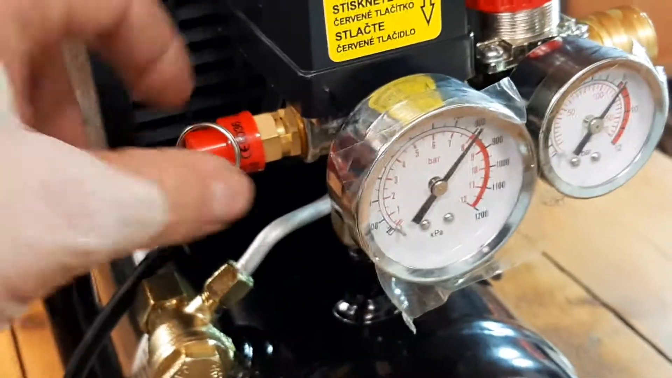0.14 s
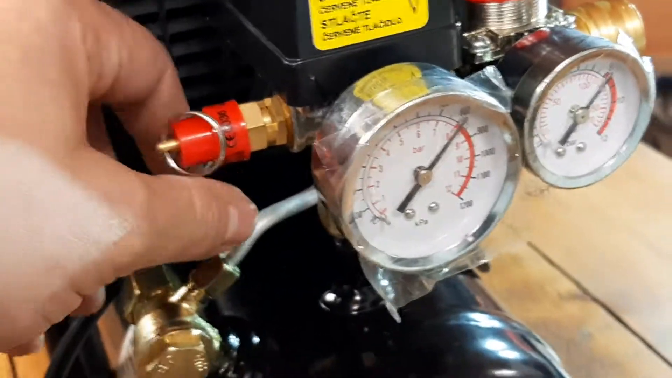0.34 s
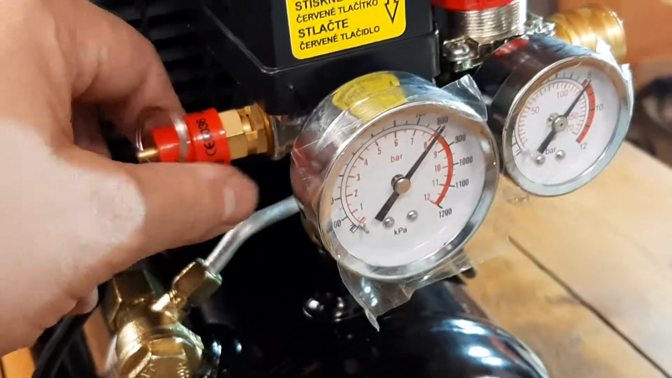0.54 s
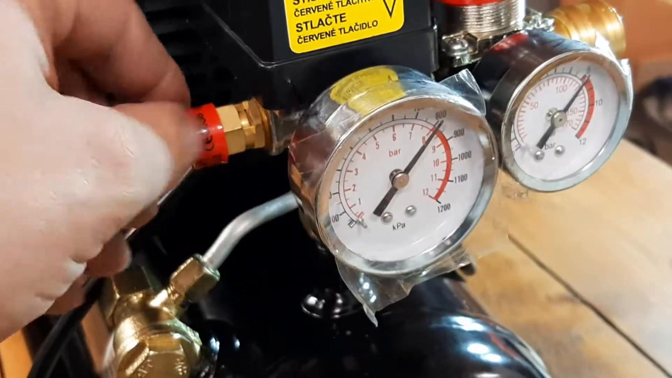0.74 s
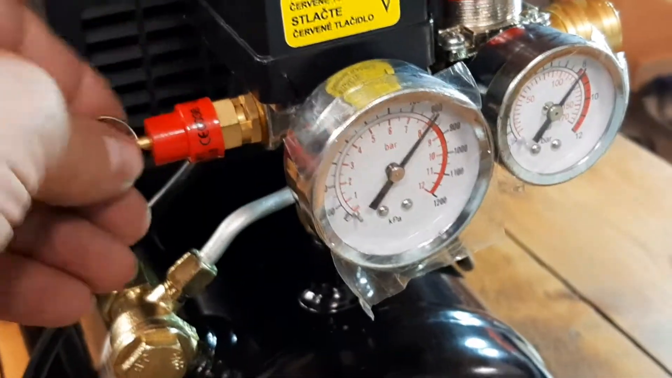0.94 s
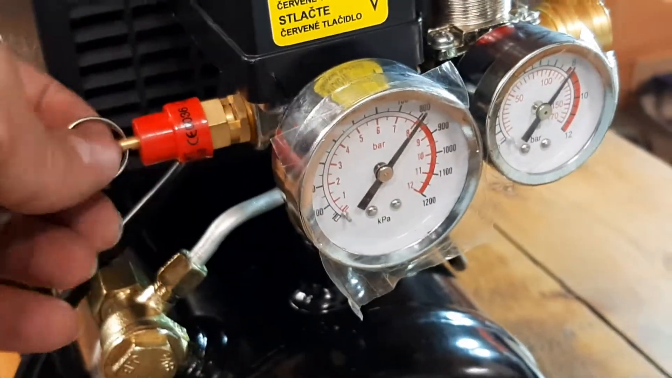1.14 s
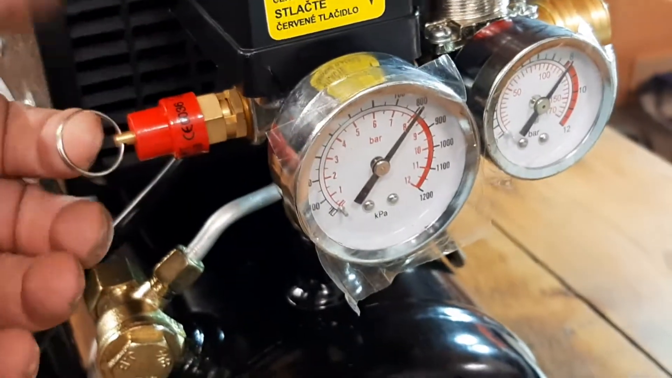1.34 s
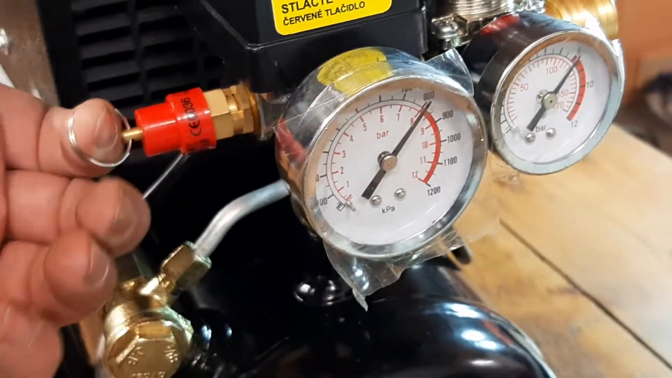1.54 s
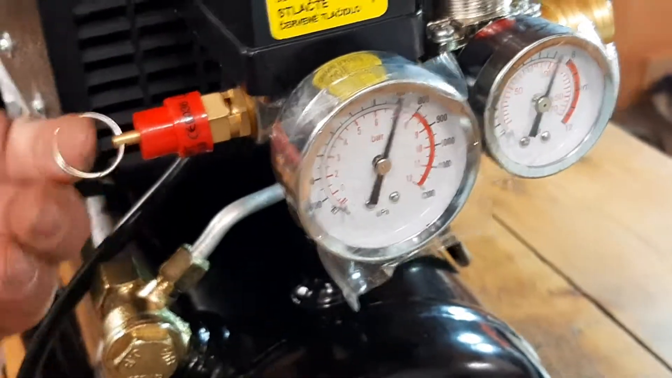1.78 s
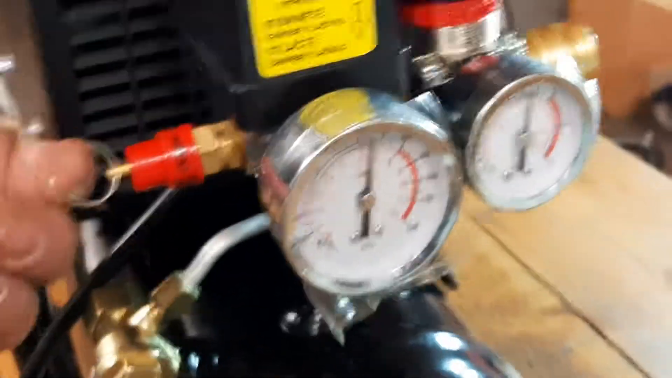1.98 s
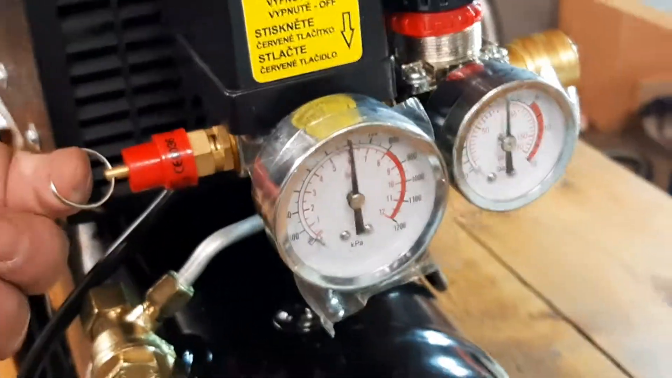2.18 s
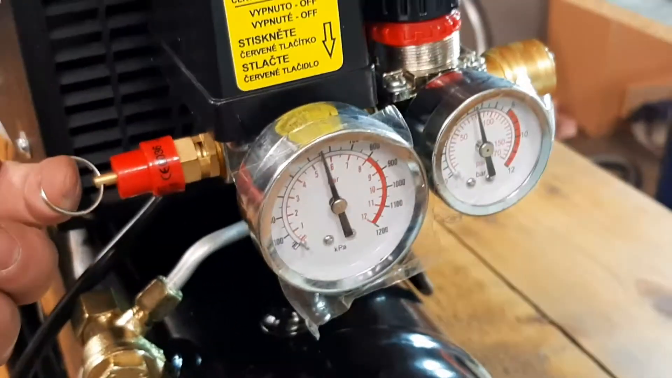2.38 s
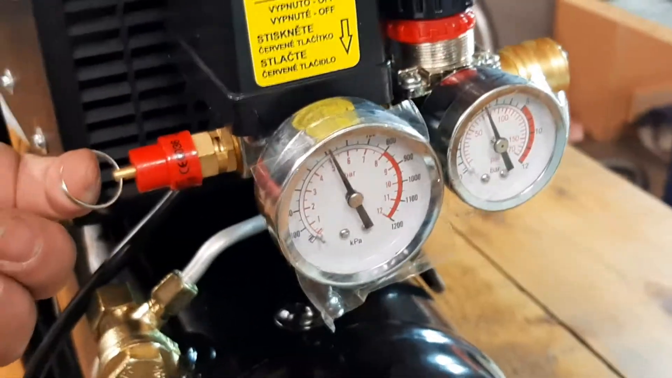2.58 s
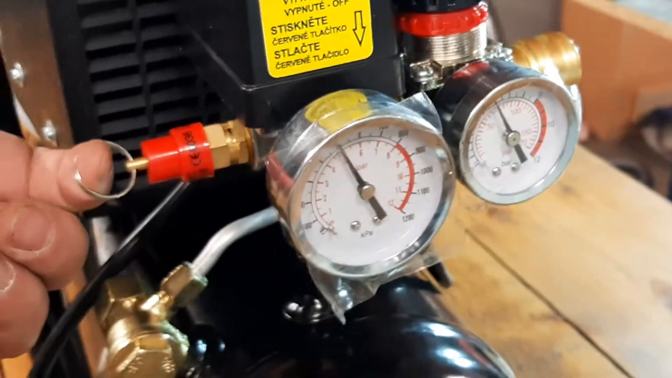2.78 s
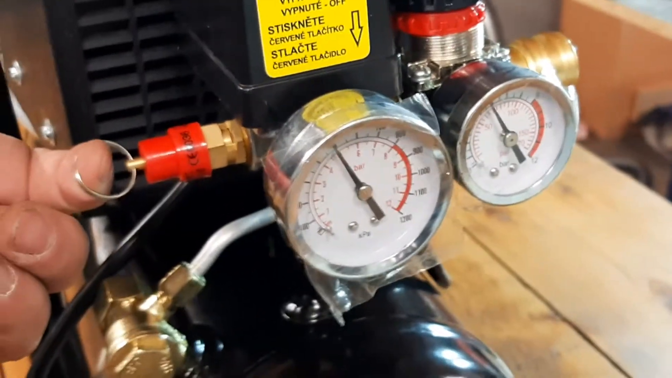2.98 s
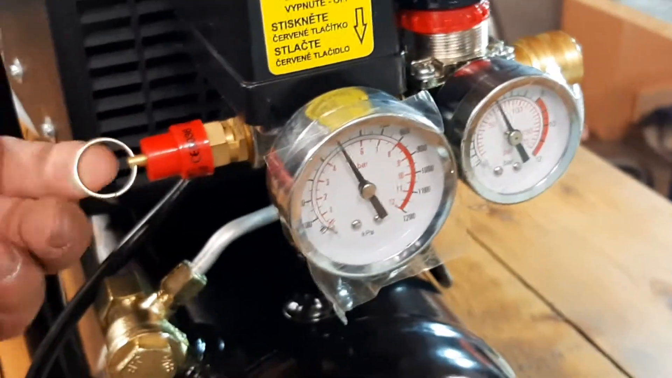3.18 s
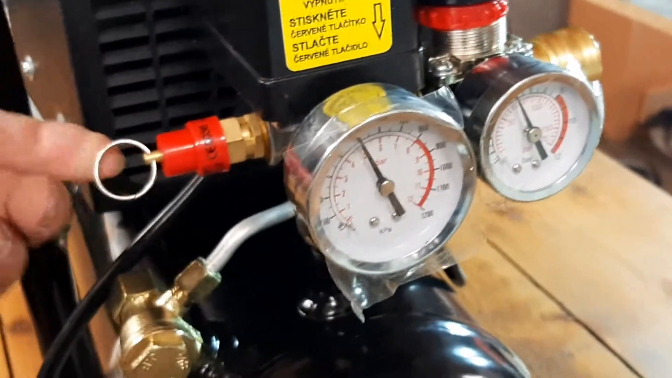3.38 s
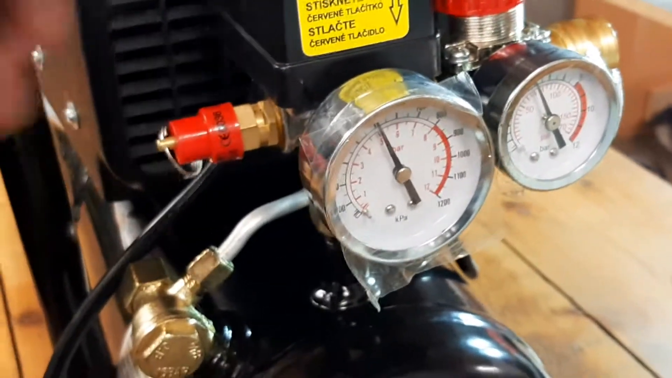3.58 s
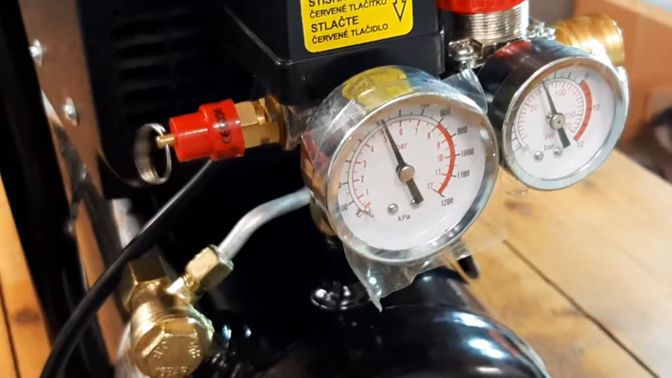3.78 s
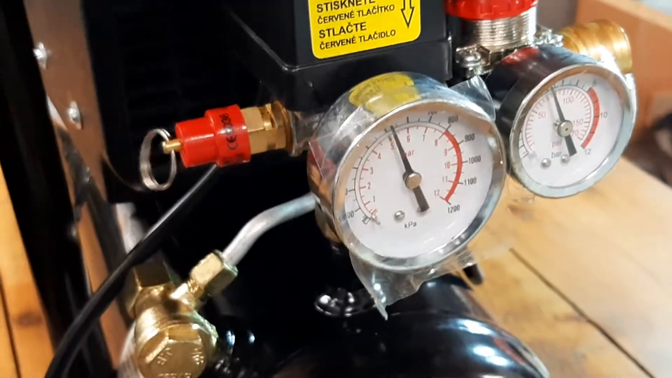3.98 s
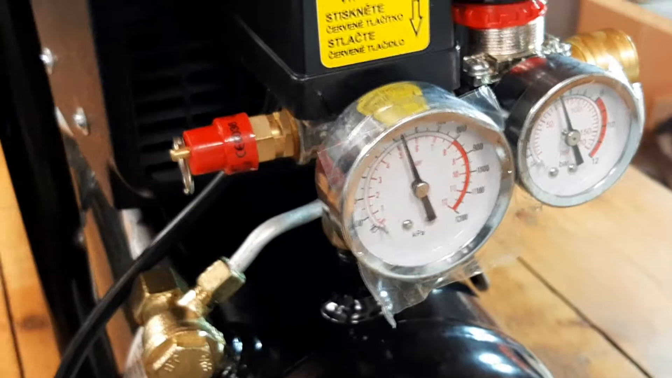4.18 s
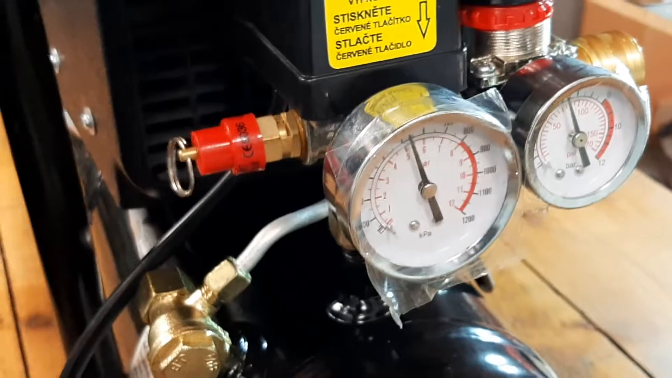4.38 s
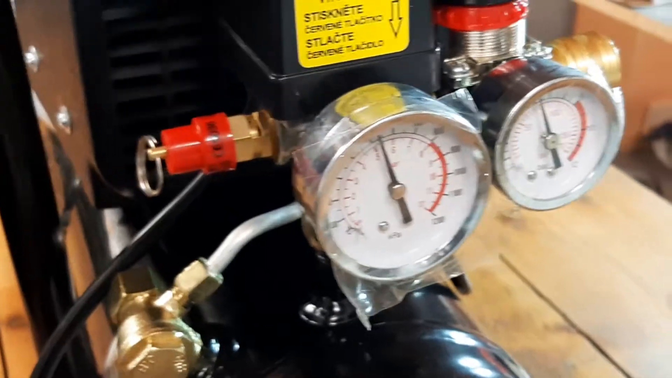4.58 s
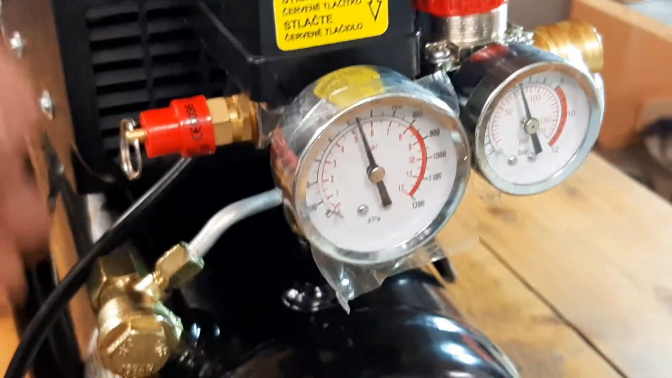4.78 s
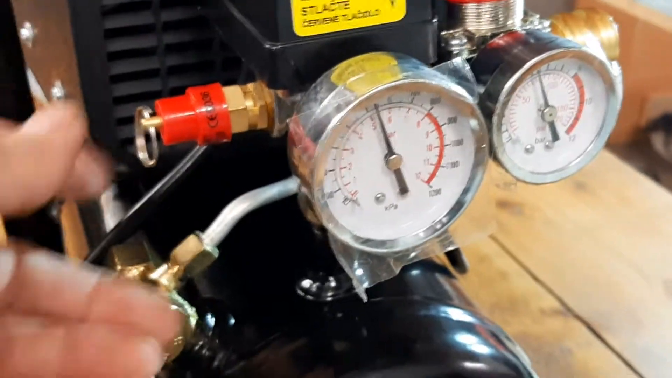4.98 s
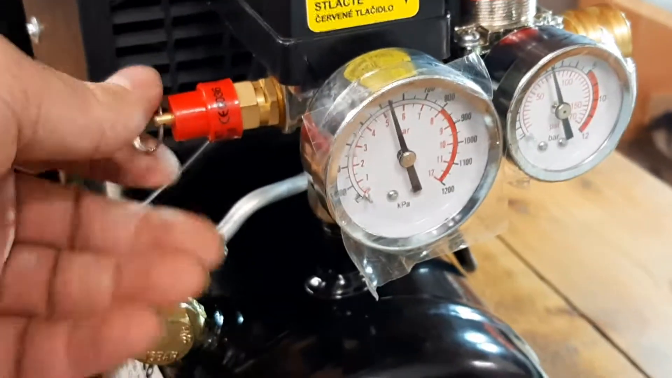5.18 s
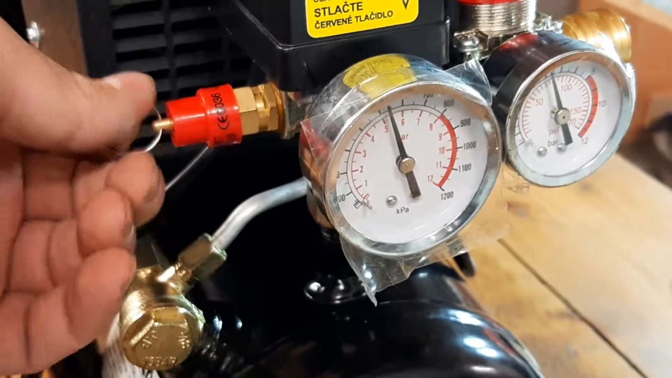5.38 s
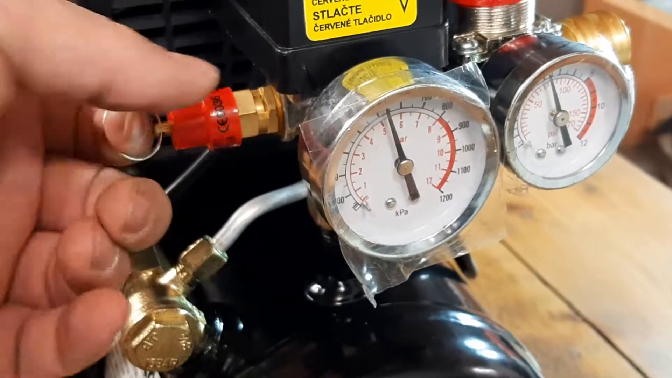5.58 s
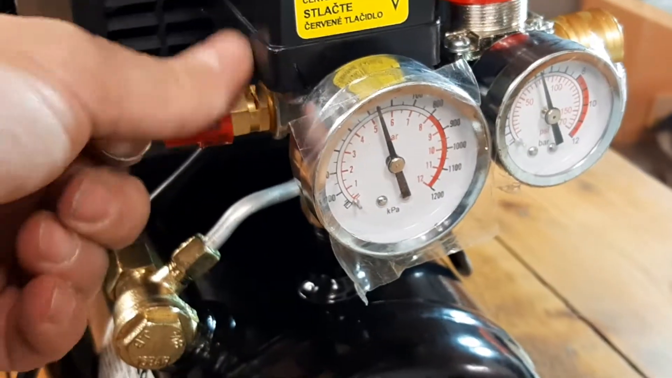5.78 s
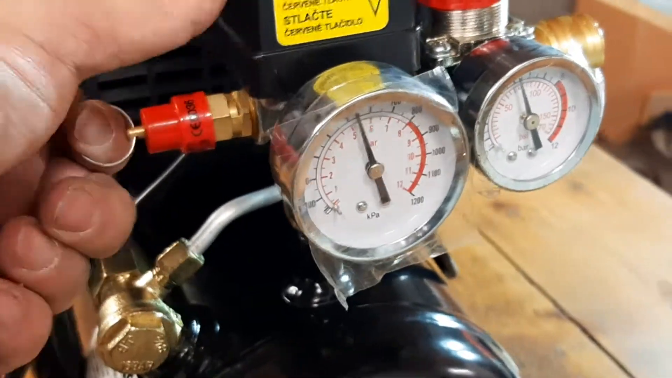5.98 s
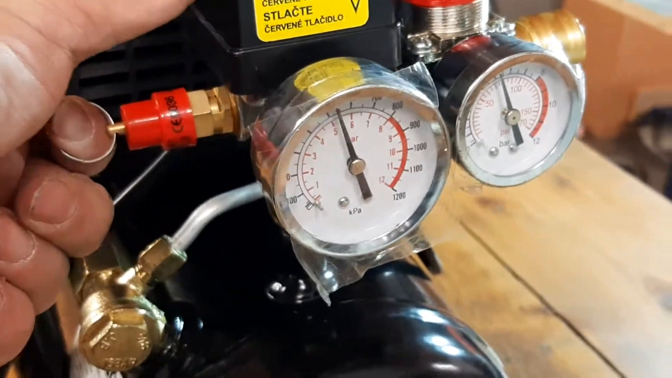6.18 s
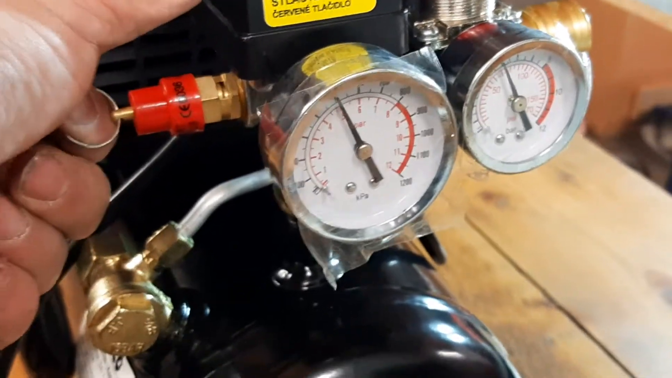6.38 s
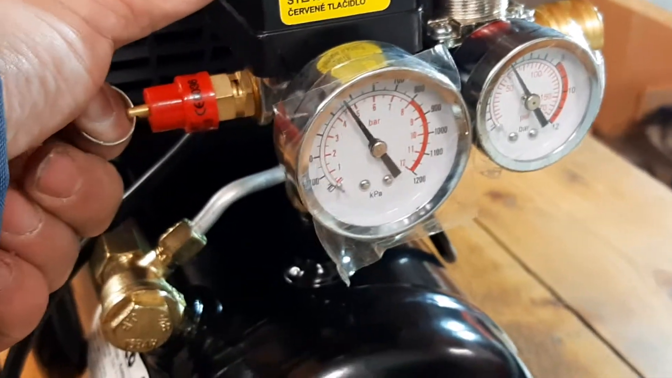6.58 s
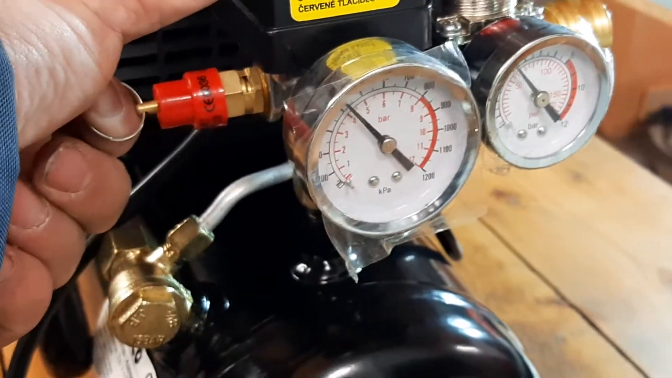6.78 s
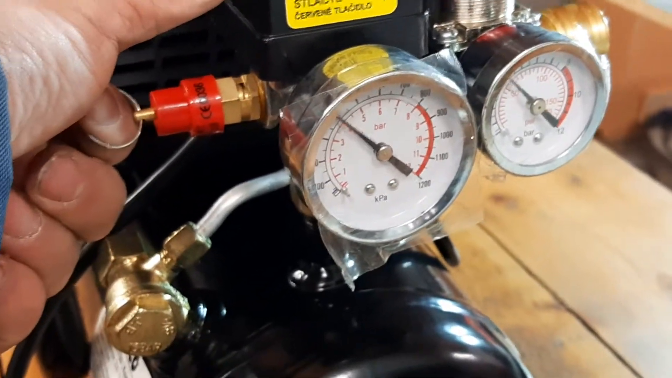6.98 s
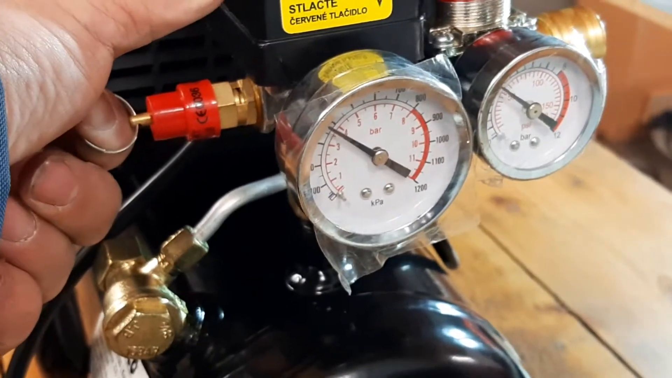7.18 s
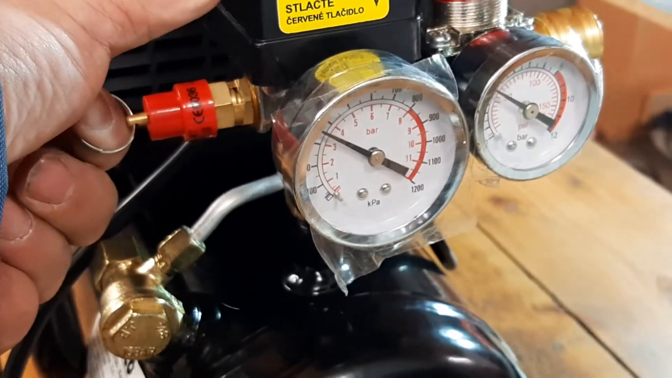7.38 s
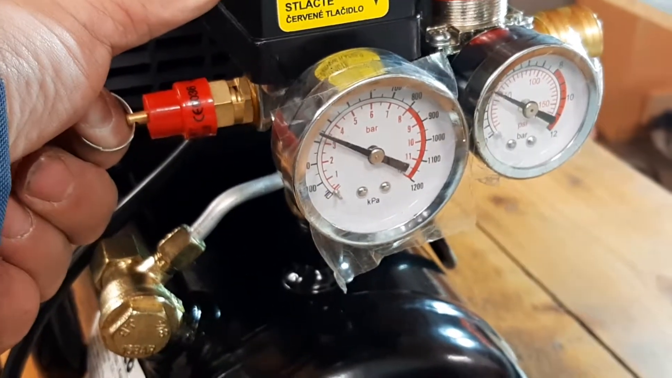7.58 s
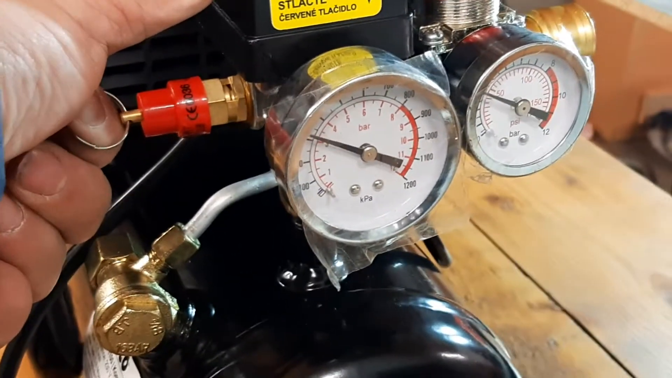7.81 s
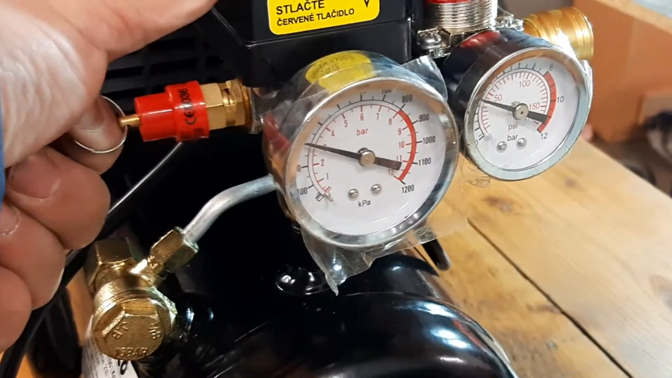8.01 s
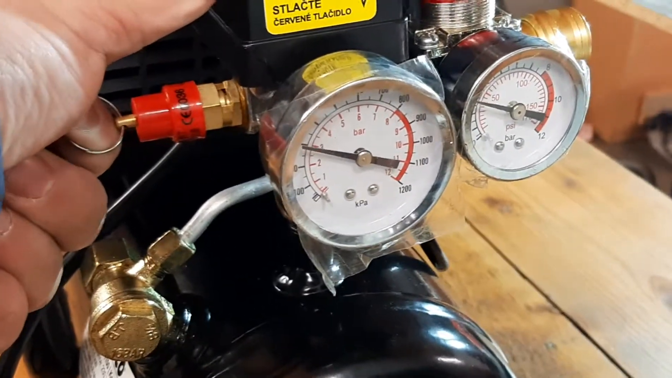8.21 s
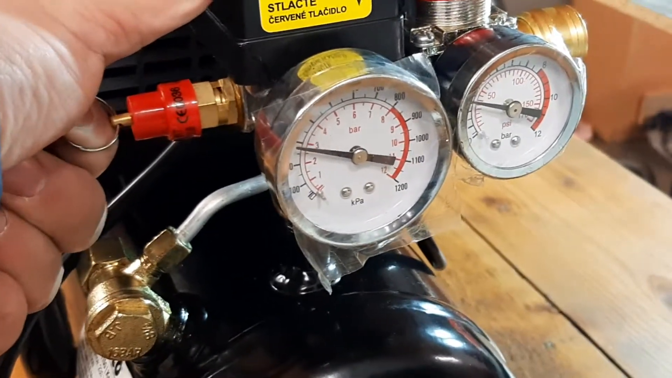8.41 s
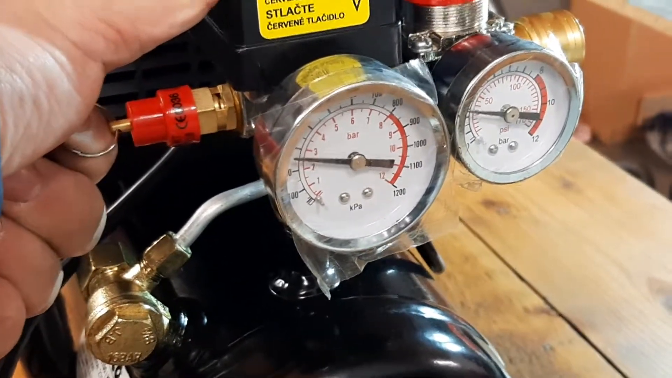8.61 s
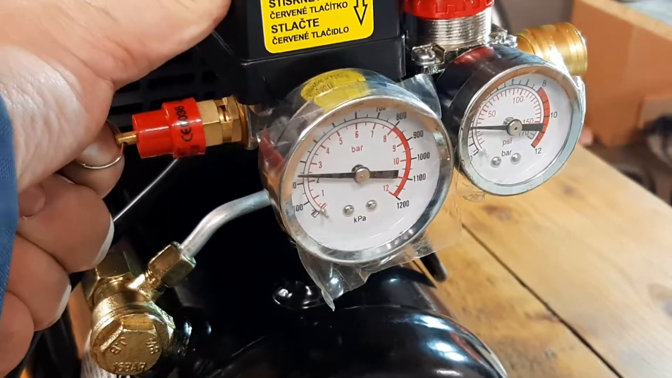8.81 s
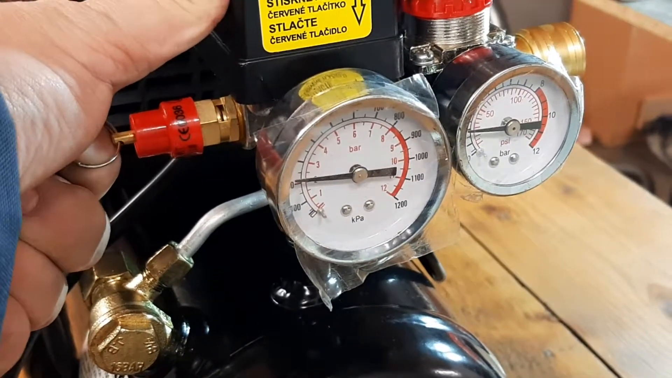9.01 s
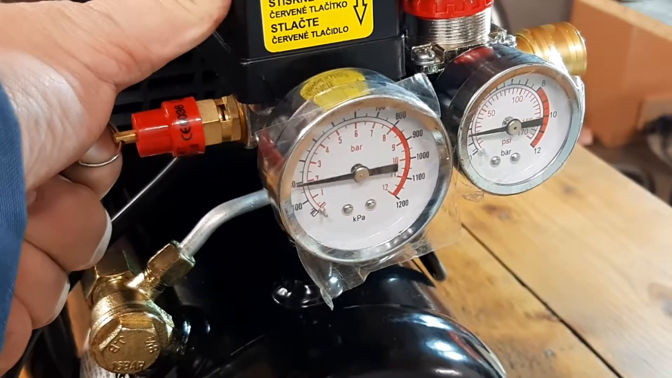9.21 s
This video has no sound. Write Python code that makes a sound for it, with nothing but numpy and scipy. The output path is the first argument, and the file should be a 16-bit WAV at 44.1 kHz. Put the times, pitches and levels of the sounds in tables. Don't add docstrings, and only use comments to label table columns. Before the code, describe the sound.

Very close stereo microphones, struck by the air stream and clipping. Light finger clicks and sleeve rustle first, then an abrupt full-band roaring hiss. It ends sharply into a droning, clattering air pump, which is cut by a dry snap, a spitting hiss and brief tank ringing. Near silence, a few firm metal clacks, then another overwhelming air blast, unsteady and duller in its weakening later part, in a short-reverb workshop.

```python
import sys
import numpy as np
from scipy import signal
from scipy.fft import rfft, irfft, next_fast_len
from scipy.io import wavfile
from scipy.ndimage import uniform_filter1d, map_coordinates

SR = 44100
rng = np.random.default_rng(int(sys.argv[2]) if len(sys.argv) > 2 else 0)


def magnitude_from_level(level_db):
    exponent = np.asarray(level_db, float) / 20
    return 10 ** exponent


def transcribe(u):
    v = np.clip(np.atleast_2d(u).T, -1, 1)
    q = np.round(v * 32767).astype(np.int16)
    wavfile.write(sys.argv[1], SR, q)


N = 407925

# (time [s], flow [dB], how squarely the wake hits the ports [dB])
VALVE_PULLS = [
    [(1.7, -24, -12), (1.71, -22, -8.5), (2.28, -20, -9.5), (2.7, -18, -9.5), (2.99, -17, -10)],
    [(6.336, -20, -10.5), (6.8, -19, -10), (7.45, -19, -8.5), (7.9, -22.5, -5), (8.47, -26.5, -7),
     (8.495, -23, -8), (8.77, -24, -7), (8.95, -20.5, -10), (9.25, -20.5, -16)],
]
# (frequency [Hz], density [dB per Hz])
JET_SPECTRUM = [(15, -54), (25, -26), (48, -20), (110, -4.5), (315, 0), (361, 1), (1210, 0), (1590, -0.5),
                (4300, 0), (6280, -4.5), (8220, -15.5), (9160, -10.5), (12000, 0.5), (14500, 0),
                (15700, -4)]
# (frequency [Hz], density [dB per Hz])
RUSTLE_SPECTRUM = [(350, -35.5), (600, -10), (1110, -12), (1360, -5.5), (1860, -7.5), (3350, -7),
                   (4470, -5.5), (6290, -4), (8970, -16.5), (12600, -9.5), (15700, -24)]
# (frequency [Hz], density [dB per Hz])
SKIN_SPECTRUM = [(500, -41.5), (1100, -13), (1500, -4), (3300, 4), (6500, -3.5), (9000, -22.5),
                 (15700, -18.5)]

PUMP_OFF_S = 4.225
MUTE_S, RETURN_S = 5.0, 5.44


def jet():
    # (left-right at start [dB], left-right at end [dB])
    drift = [
        (0, 2.5),
        (0, 1),
    ]
    usual_flow_db, usual_wake_db = -20, -9
    edge_base_db, edge_follows = -2, 0.23
    fizz_base_db, fizz_follows, fizz_loss_db_per_s = 2.8, 0.6, 1.6
    bass_hz, bass_grows = 170, 1.2

    hiss = rush(JET_SPECTRUM, patchy_db=1.12, lo_hz=550, hi_hz=3750)
    buffet = magnitude_from_level(1.3 * np.array([wobble(25), wobble(25)]))
    roar = rush(JET_SPECTRUM, patchy_db=1.25, hi_hz=530) * buffet
    edge = rush(JET_SPECTRUM, patchy_db=1.8, lo_hz=3900, hi_hz=8300)
    fizz = rush(JET_SPECTRUM, patchy_db=1.8, lo_hz=8440)
    bass = filtered(roar, lambda hz: 1 / (1 + (hz / bass_hz) ** 2))

    out = np.zeros((2, N))
    open_s = np.cumsum(sum(curves(pull)[0] for pull in VALVE_PULLS)) / SR
    for pull, lean_db in zip(VALVE_PULLS, drift):
        gate, flow_db, wake_db = curves(pull)
        more_db = flow_db - usual_flow_db
        wake = roar + (magnitude_from_level(bass_grows * (wake_db - usual_wake_db)) - 1) * bass
        edge_db = edge_base_db + edge_follows * more_db
        fizz_db = fizz_base_db + fizz_follows * more_db - fizz_loss_db_per_s * open_s
        pan = panned(np.interp(clock(), [pull[0][0], pull[-1][0]], lean_db))
        flow = gate * magnitude_from_level(usual_flow_db + 3.5 + 0.7 * wobble(30)) * pan
        body = magnitude_from_level(more_db) * (hiss + magnitude_from_level(wake_db) * wake)
        out += flow * (body + magnitude_from_level(edge_db) * edge + magnitude_from_level(fizz_db) * fizz)

    u = np.arange(SR // 20) / SR / 0.0015
    start = round(VALVE_PULLS[0][-1][0] * SR)
    out[:, start:start + len(u)] += magnitude_from_level([[-1.5], [-9]]) * u * (1 - u / 2) * np.exp(-u)
    return out


def leak():
    # (time [s], level [dB])
    cracks = [
        [(1.688, -58), (1.694, -30), (1.6995, -30)],
        [(6.319, -61), (6.327, -37), (6.335, -30)],
    ]
    thin = rush(JET_SPECTRUM, patchy_db=3.5, lo_hz=3500)
    return sum(gate * magnitude_from_level(db) * thin for gate, db in map(curves, cracks))


def pump():
    # (multiple of shaft rate, level [dB])
    shaft_orders = [(1, -23), (2, -20.5), (3, -16), (4, -12), (5, -6.5), (6, -11.5), (7, -25), (8, -12),
                    (9, -8), (10, -11.5), (11, -3.5), (12, 0), (13, -7.5), (14, -14.5), (15, -9.5),
                    (16, -3), (17, -1.5), (18, -9.5), (19, -3.5), (20, -10), (21, -11), (22, -22),
                    (23, -19.5), (24, -18), (25, -17), (27, -17), (28, -10), (29, -12.5), (31, -14),
                    (50, -16.5)]
    # (frequency [Hz], density [dB per Hz])
    air_spectrum = [(24, -67), (40, -29.5), (98, -29.5), (235, -22), (326, -23.5), (564, -5.5), (655, -13),
                    (761, -11.5), (1080, -22.5), (1350, -15.5), (2650, -19.5), (6190, -18), (8150, -32),
                    (10500, -27.5), (15600, -37.5)]
    # (frequency [Hz], left-right [dB])
    side_balance = [(60, -3.5), (110, 3), (200, 6.5), (380, -10.5), (700, -3), (1290, 4.5), (2380, -3.5),
                    (4400, -10), (8120, -2.5), (15000, 7.5)]
    # (frequency [Hz], density [dB per Hz])
    clack_spectrum = [(820, -34), (1400, -9), (1500, -5), (1590, 1.5), (1990, -9.5), (2380, 0.5),
                      (2540, -9.5), (4090, -14), (4940, -19.5), (6000, -17.5), (7800, -42.5), (13200, -120)]
    on_s, shaft_hz = 2.99, 47.35
    start_air_db, start_fade_s, spin_up_db = 16, 0.08, -4
    final_rise_db, final_rise_s, air_rise_factor = 4, 0.12, 1.3

    gate = between(on_s, PUMP_OFF_S)
    turns = shaft_hz * clock()
    starting = np.exp(-np.abs(clock() - on_s) / start_fade_s)
    rise_db = final_rise_db * np.clip(1 - (PUMP_OFF_S - clock()) / final_rise_s, 0, 1)
    tone_db = -28 + spin_up_db * starting + rise_db
    air_db = -40 + start_air_db * starting + air_rise_factor * rise_db

    tone = np.zeros((2, N))
    for (k, db), (u, v, w) in zip(shaft_orders, rng.standard_normal((len(shaft_orders), 3))):
        apart = np.array([[1], [-1]]) * np.clip(v * 0.026 * k, -1, 1)
        smear = u * np.clip(0.3 * (k - 6), 0.6, 1.5)
        gain = magnitude_from_level(db + 0.46 * wobble(14)) * panned(0.82 * w)[:, None]
        tone += gain * np.cos(2 * np.pi * k * turns + smear + apart)

    strokes = np.diff(np.floor(turns), prepend=0) * magnitude_from_level(0.8 * wobble(32))
    t = np.arange(SR // 5) / SR
    housing = rng.standard_normal((2, len(t))) * magnitude_from_level(-60 * t / 0.14)
    struck = signal.fftconvolve(strokes[None], housing, axes=1)[:, :N]
    clack = filtered(struck, lambda hz: magnitude_from_level(along(clack_spectrum, hz)))
    breathing = 1 + 0.25 * np.cos(2 * np.pi * turns + 0.27)
    air = rush(air_spectrum, patchy_db=-0.2, alike=0.1) * breathing
    noise = magnitude_from_level(tone_db - 10.0) * unit(clack) + magnitude_from_level(air_db + 4) * air
    sided = filtered(noise, lambda hz: panned(along(side_balance, hz)))
    return gate * (magnitude_from_level(tone_db + 0.46) * unit(tone) + sided)


def unloader():
    # (frequency [Hz], density [dB per Hz])
    spit_spectrum = [(650, -45), (1100, -17), (1390, -14), (1920, -14.5), (2740, -15), (3060, -10.5),
                     (3350, -18.5), (3580, -8.5), (4990, 3.5), (5710, -8.5), (6240, -4.5), (9100, -12),
                     (11800, -9), (12600, -7.5), (15700, -11.5)]
    # (frequency [Hz], density [dB per Hz])
    rumble_spectrum = [(18, -58.5), (30, -29), (108, -17), (135, -6), (244, -13.5), (302, -10), (571, -4.5),
                       (673, -6), (832, -8), (1500, -25), (1950, -50.5), (3300, -120)]
    # (frequency [Hz], width [Hz], level [dB])
    tank_modes = [(229, 25, -4.5), (423, 30, -2.5), (519, 14, 0.5), (573, 11, 1.5), (870, 17, -5.5)]
    spit_db, spit_s, shut_db = -25, 0.13, -3
    mute_db_per_s = 150

    after_s = np.maximum(clock() - PUMP_OFF_S - spit_s, 0)

    def fade(t60_s, glow_db, glow_t60_s):
        quick = magnitude_from_level(spit_db + shut_db * (after_s > 0) - 60 * after_s / t60_s)
        return quick + magnitude_from_level(glow_db - 60 * after_s / glow_t60_s)

    off = between(PUMP_OFF_S, RETURN_S)
    gate = off * magnitude_from_level(-mute_db_per_s * np.maximum(clock() - MUTE_S, 0))
    spit = fade(0.4, -48.5, 1.33) * rush(spit_spectrum, patchy_db=2.1, hi_hz=7800)
    fizz = fade(0.29, -73, 1.1) * rush(spit_spectrum, patchy_db=-3.0, lo_hz=8000)
    rumble = rush(rumble_spectrum, patchy_db=1.0, alike=0.73)
    shaking = rush(rumble_spectrum, patchy_db=0.5, alike=0.8)
    ringing = unit(filtered(shaking, resonances(tank_modes)))
    coast_db = -24.5 - 60 * np.abs(clock() - PUMP_OFF_S) / 0.57
    coast = magnitude_from_level(coast_db) * (magnitude_from_level(-2) * rumble + magnitude_from_level(-0.5) * ringing)
    shell = off * magnitude_from_level(-52.5 - 60 * after_s / 1.2) * ringing
    return gate * (magnitude_from_level(2.5) * spit + magnitude_from_level(6.5) * fizz + coast) + shell


def switch():
    snap_s, snap_db, t60_s = 4.216, -21, 0.03
    t = clock() - snap_s
    decay = (t > 0) * magnitude_from_level(snap_db - 60 * np.abs(t) / t60_s)
    return decay * rush(SKIN_SPECTRUM, patchy_db=3.0, alike=0.4)


def fingers():
    # (time [s], peak [dB], pitch [Hz], body knock [dB], left-right [dB])
    touches = [(0.4484, -54, 1350, -22, -2.0), (0.515, -52, 1360, -26, 1), (0.5344, -50, 3320, -16, -2.0),
               (0.6439, -47, 4880, -18, -4.5), (0.7282, -54.5, 3350, -22, -4.5),
               (0.7557, -45.5, 3330, -28, -8), (0.7794, -47, 3300, -27, -2.5),
               (0.9494, -54, 4210, -26, 1.5), (1.2494, -58, 1380, -23, 2.0), (1.4346, -47.5, 1370, -25, 4),
               (1.4694, -55, 1400, -14, -4), (5.19, -59.5, 3310, -23, 0.5), (5.4594, -76, 1390, -12, 0),
               (5.7887, -46.5, 2070, -1.5, 0), (5.8214, -51, 2080, 0, 1), (5.8384, -47, 2040, 3, 3.5),
               (5.8465, -45.5, 2070, 4.5, -3.5), (5.8594, -46, 2140, -13, -3),
               (6.0294, -60, 1400, -26, -2.5), (6.0594, -56, 2310, -22, -4)]
    # (frequency [Hz], width [Hz], level [dB])
    ring_modes = [(1390, 60, -8.5), (2046, 120, -1.5), (2330, 70, -3.5), (3035, 90, -4.5),
                  (4150, 250, -11.5), (5570, 700, -14)]
    skin, ticks, knocks, out = np.zeros((4, 2, N))
    t = np.arange(SR // 8) / SR
    for s, db, hz, knock_db, pan_db in touches:
        a, b = rng.standard_normal((2, len(t)))
        scrape = panned(pan_db)[:, None] * (a + 0.7 * np.array([b, -b]))
        at = slice(round(s * SR), round(s * SR) + len(t))
        blow = magnitude_from_level(db - 60 * t / 0.079) * (1 - np.exp(-t / 0.0015)) * scrape
        ping = np.sin(2 * np.pi * hz * t) * magnitude_from_level(-60 * t / 0.012)
        out[:, at] += magnitude_from_level(-26.0) * signal.fftconvolve(blow, ping[None], axes=1)[:, :len(t)]
        skin[:, at] += magnitude_from_level(-6.5) * blow + magnitude_from_level(db - 4.5 - 60 * t / 0.012) * scrape
        ticks[:, at] += magnitude_from_level(17.5 + 0.79 * knock_db) * blow
        knocks[:, at] += magnitude_from_level(db + knock_db + 16 - 60 * t / 0.05) * scrape

    def ring(hz):
        return sum(resonances([mode])(hz) ** 2 for mode in ring_modes)

    body = resonances([(700, 150, -1), (818, 27, 6.5), (914, 40, -1.5)])
    out += filtered(skin, lambda hz: magnitude_from_level(along(SKIN_SPECTRUM, hz)))
    return out + filtered(ticks, ring) + filtered(knocks, body)


def rubbing():
    # (time [s], length [s], level [dB])
    slides = [
        (.88, .14, -64),
        (1.195, 0.09, -66),
        (1.57, .07, -66),
        (5.997, 0.096, -65.5),
    ]
    swell = 0
    for s, length_s, db in slides:
        swell = swell + magnitude_from_level(db) * np.sin(np.pi * np.clip((clock() - s) / length_s, 0, 1))
    return swell * rush(RUSTLE_SPECTRUM, patchy_db=3, lo_hz=3500)


def shop(x):
    # (frequency [Hz], t60 [s])
    decay_times = [(200, .3), (2000, 0.29), (7000, 0.6), (14000, 0.42)]
    hz, t, z = signal.stft(rng.standard_normal((2, SR // 2)), SR, nperseg=256)
    decay = magnitude_from_level(-60 * t / along(decay_times, hz)[:, None])
    tail = signal.istft(z * decay, SR, nperseg=256)[1]
    return signal.fftconvolve(x, tail / np.linalg.norm(tail[0]), axes=1)[:, :N]


def background():
    # (frequency [Hz], density [dB per Hz])
    hum_spectrum = [(15, -68), (25, -40), (54, -36), (96, -7.5), (134, -12), (211, 0.5), (286, -7.5),
                    (345, -22.5), (607, -36), (653, -40.5), (800, -47.5), (1040, -72.5), (1760, -120)]
    # (time [s], spread [s], level [dB])
    sleeve_moves = [
        (.05, 0.16, -58.5),
        (.62, .07, -72),
        (.92, .08, -68),
        (1.475, 0.031, -67),
        (1.66, .04, -73),
        (5.93, 0.1, -75),
    ]
    hum_db, stir_db = -55, -71
    duck_s, ducked_db, return_db_per_s, returned_db = 1.7, -37, 150, -12

    hum = rush(hum_spectrum, patchy_db=-1.5, alike=0.95)
    rustle = rush(RUSTLE_SPECTRUM, patchy_db=1.0)
    back_db = np.clip(ducked_db + return_db_per_s * (clock() - RETURN_S), ducked_db, returned_db)
    gain = between(0, duck_s) + between(MUTE_S, VALVE_PULLS[1][0][0]) * magnitude_from_level(back_db)
    swell_power = sum(magnitude_from_level(2 * db) * np.exp(-((clock() - s) / spread_s) ** 2)
                      for s, spread_s, db in sleeve_moves)
    cloth = magnitude_from_level(1.5) * np.sqrt(swell_power + (gain * magnitude_from_level(stir_db)) ** 2) * rustle
    return gain * magnitude_from_level(hum_db + 1.5 + 1.5 * wobble(8)) * hum + cloth


def rush(spectrum, patchy_db, alike=0, lo_hz=1, hi_hz=1e6):
    z = signal.stft(rng.standard_normal((2, N)), nperseg=512)[2]
    field = uniform_filter1d(rng.standard_normal(z.shape), size=6, axis=1)
    field = uniform_filter1d(field, size=12, axis=2)
    a, b = signal.istft(z * magnitude_from_level(patchy_db * unit(field)), nperseg=512)[1][:, :N]
    turn = np.arccos(np.clip(alike, -1, 1)) / 2
    pair = np.cos(turn) * a + np.sin(turn) * np.array([b, -b])

    def response(hz):
        low_pass = 1 / (1 + (hz / hi_hz) ** 6)
        high_pass = 1 / (1 + (lo_hz / (hz + 1)) ** 6)
        return magnitude_from_level(along(spectrum, hz)) * np.sqrt(low_pass * high_pass)

    return unit(filtered(pair, response))


def resonances(modes):
    def response(f):
        return sum((-1) ** k * magnitude_from_level(db) * 1j * f * w / (c * c - f * f + 1j * f * w)
                   for k, (c, w, db) in enumerate(modes))
    return response


def filtered(x, response):
    m = next_fast_len(N + 8192)
    return irfft(rfft(x, m) * response(np.fft.rfftfreq(m, 1 / SR)), m)[..., :N]


def along(points, hz):
    f, v = np.transpose(points)
    return np.interp(np.log(hz + 1), np.log(f + 1), v)


def curves(rows):
    s, *cols = np.transpose(rows)
    return [between(s[0], s[-1])] + [np.interp(clock(), s, c) for c in cols]


def wobble(rate_hz):
    knots = rng.standard_normal(int(N * rate_hz / SR) + 4)
    return map_coordinates(knots, [np.arange(N) * rate_hz / SR])


def between(start_s, stop_s):
    is_open = (clock() >= start_s) & (clock() <= stop_s)
    return uniform_filter1d(1. * is_open, size=66, mode="nearest")


def panned(db):
    return magnitude_from_level(np.array([db / 2, -db / 2]))


def unit(x):
    return x / np.sqrt(np.mean(x ** 2) + 1e-20)


def clock():
    return np.arange(N) / SR


def scene():
    # (frequency [Hz], level [dB])
    airborne = [(300, -45.5), (2000, -30), (5500, -7), (8300, -6), (12000, -9), (15700, -12)]
    blast = jet() + leak()
    touch = fingers()
    radiated = filtered(blast, lambda hz: magnitude_from_level(along(airborne, hz)))
    walls = shop(radiated + magnitude_from_level(-6) * touch)
    return blast + touch + walls + pump() + unloader() + background() + rubbing() + switch()


def top_cut(x):
    return signal.sosfilt(signal.butter(12, 16680, fs=SR, output="sos"), x)


def record(dry):
    # (frequency [Hz], density [dB per Hz])
    noise_spectrum = [(12, -28.5), (20, -1.5), (27, -22), (93, -5), (233, -4.5), (275, -14), (537, -25),
                      (5000, -28.5), (15700, -34)]
    top_hz, slope_hz = 15750, 150

    def band_limit(hz):
        return np.cos(np.pi / 2 * np.clip((hz - top_hz) / slope_hz + 0.5, 0, 1)) ** 2

    self_noise = magnitude_from_level(-78.5) * rush(noise_spectrum, patchy_db=-2.0, alike=0.5)
    heard = filtered(dry + self_noise, band_limit)
    return top_cut(np.clip(heard, -1, 1))


dry = scene()
out = record(dry)
transcribe(out)
```